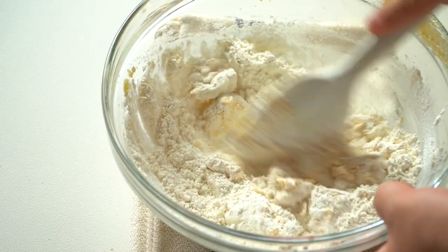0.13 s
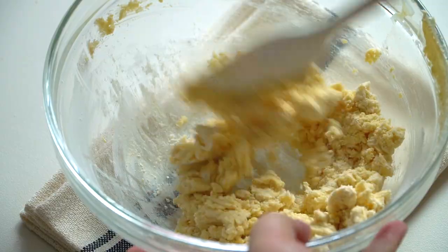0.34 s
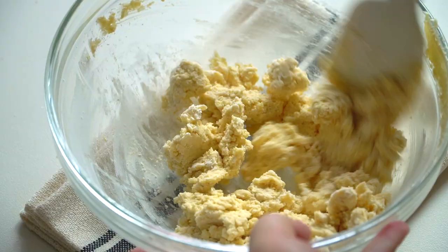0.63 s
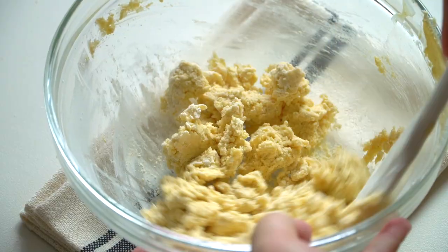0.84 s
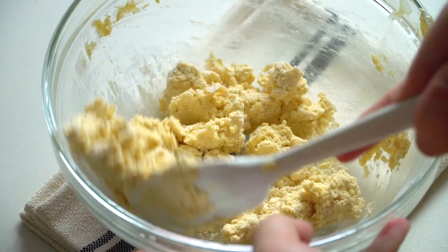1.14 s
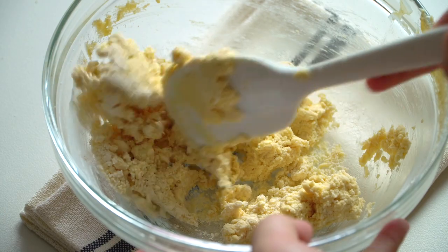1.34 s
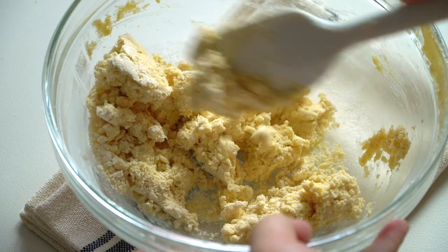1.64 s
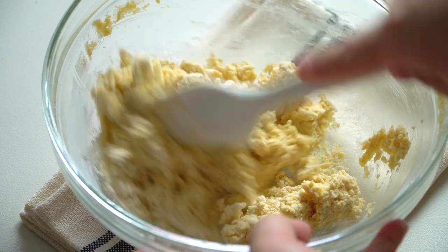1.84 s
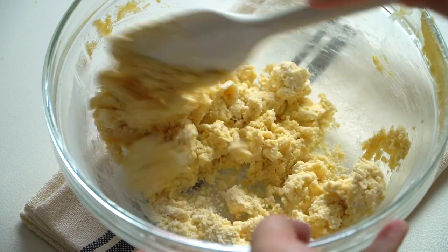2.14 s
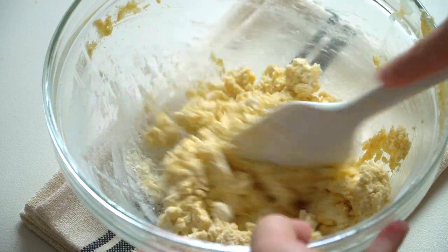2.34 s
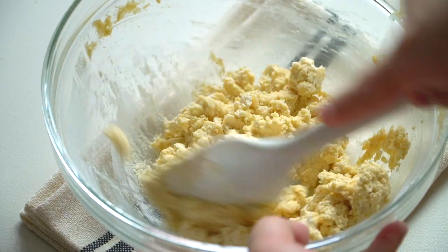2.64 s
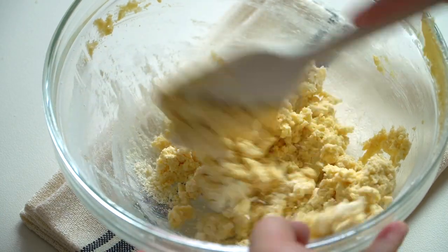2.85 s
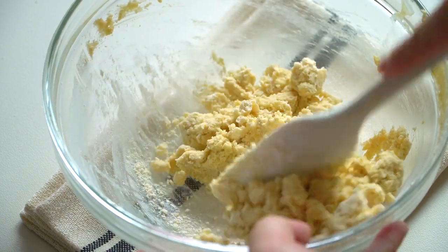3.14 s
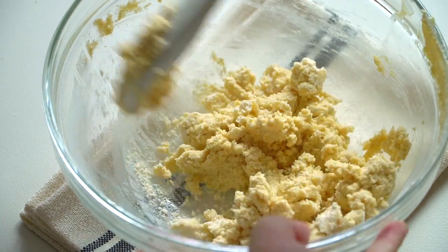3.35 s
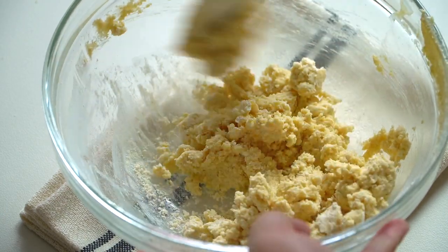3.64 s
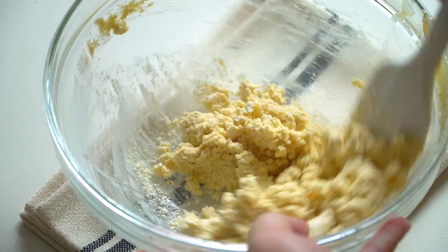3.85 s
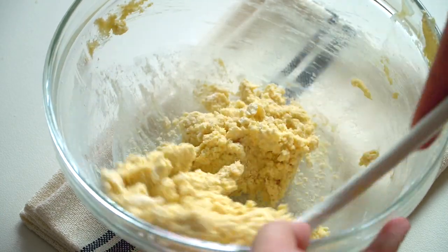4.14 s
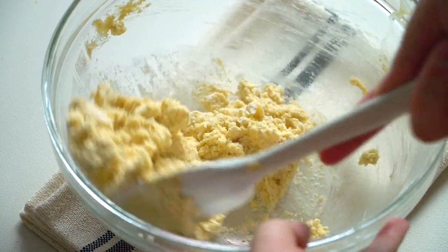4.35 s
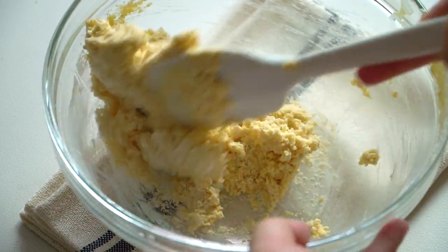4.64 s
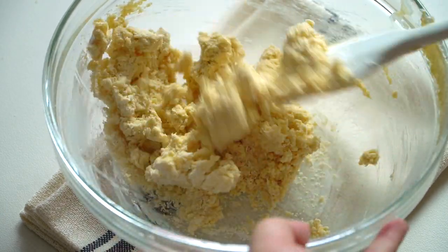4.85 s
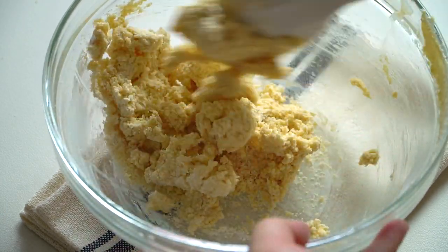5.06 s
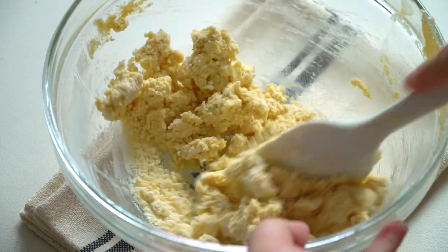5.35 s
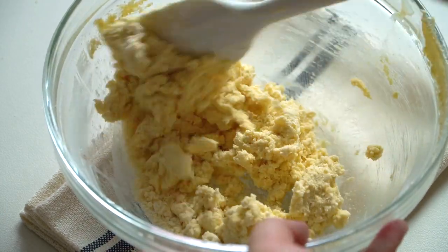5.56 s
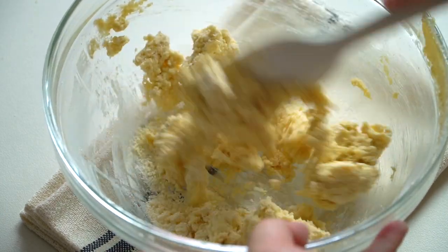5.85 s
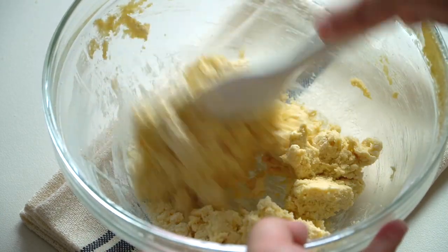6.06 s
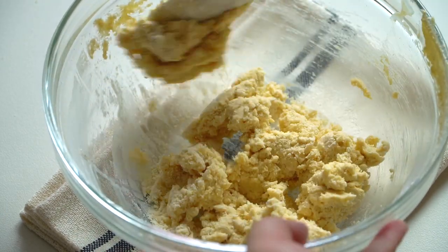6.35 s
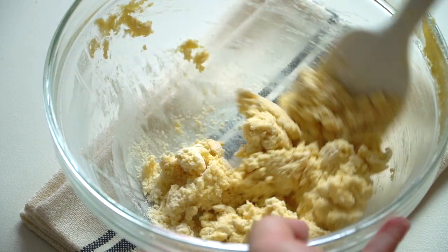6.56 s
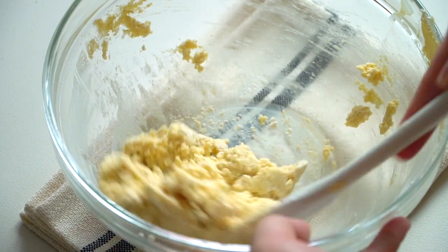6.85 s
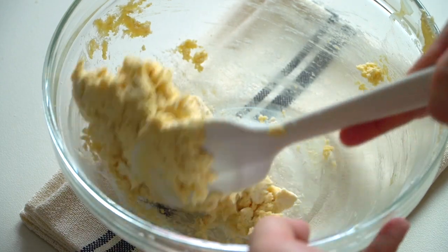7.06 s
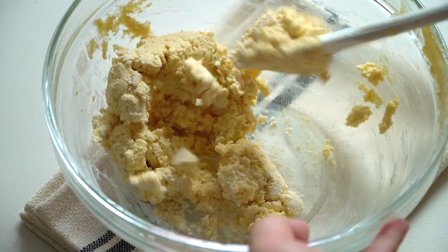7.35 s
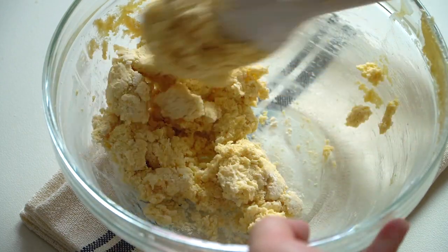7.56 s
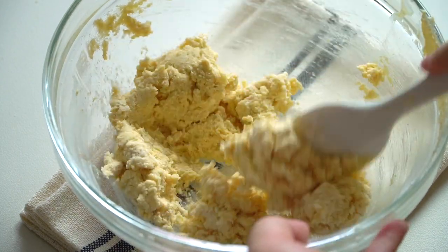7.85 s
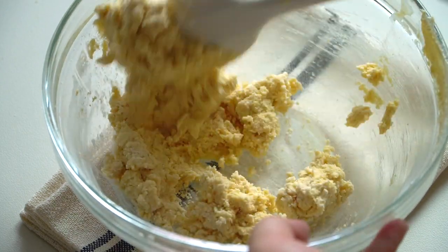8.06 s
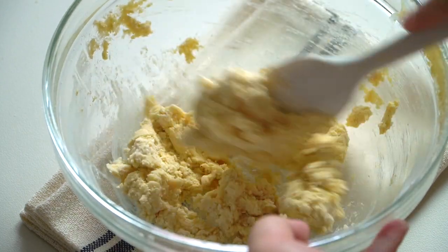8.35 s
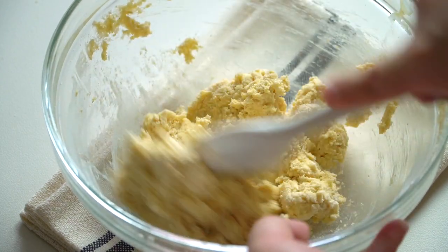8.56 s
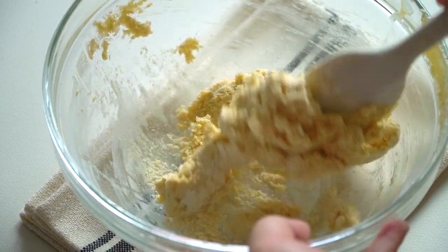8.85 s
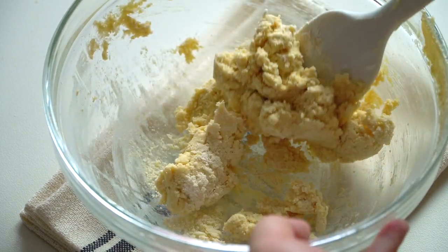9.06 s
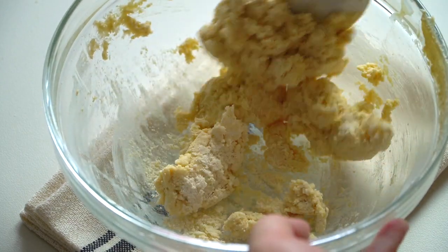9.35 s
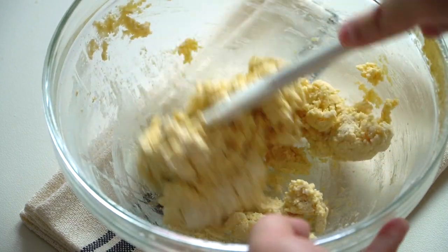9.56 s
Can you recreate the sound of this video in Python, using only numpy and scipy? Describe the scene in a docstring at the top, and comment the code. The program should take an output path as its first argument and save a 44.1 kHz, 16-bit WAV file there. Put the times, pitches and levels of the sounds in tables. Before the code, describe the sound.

A close, dry, centred take of crumbly dough being mixed in a glass bowl. At 0.1 s the blade plunges with a low thump and packed flour groan; a short bright crunch and ticks follow at 0.3. From 0.5 to 1.3 a long gritty sweep hisses round the glass, beginning with a knock. Chops crunch at 1.9, 2.3, 2.7 and 3.1, with deep bowl thuds and small ticks. A second sweep runs 3.5 to 4.6 over a low drag of the bowl, then crumbs patter. Chops return around 5.3, 5.7 and 6.05. A third sweep lasts 6.4 to 7.1. Folds at 7.8, 8.2 and 8.65 crunch and knock; a sharp tick at 8.7 leads into spilling crumbs and light ticks until 9.5, then softer pushes and a bright tick near 9.7. Faint appliance throbs, about seven per second, and low room hum sit behind.

```python
"""A spatula chops, folds and scrapes crumbly cookie dough round a glass bowl on a kitchen counter.
Friction is random grit filtered by bowl and air pocket: chops crunch, long sweeps hiss along the glass.
Damped oscillations give the thumps of the bowl on its towel, the knocks of the blade and the ticks of
hard bits; crumbs are short pings, and sticking dough rings the wall. An appliance throbs softly behind,
as decaying casing modes, over filtered noise for the room."""
import sys
import numpy as np
from scipy import signal
from scipy.fft import rfft, irfft
from scipy.io import wavfile
from scipy.ndimage import uniform_filter1d

SR = 44100
rng = np.random.default_rng(int(sys.argv[2]) if len(sys.argv) > 2 else 0)


def master(y):
    """Save y as 16-bit WAV."""
    cut = np.clip(np.atleast_2d(y).T, -1, 1)
    pcm = np.round(cut * 32767)  # scale
    wavfile.write(sys.argv[1], SR, pcm.astype(np.int16))


N = 427769
TIME = np.arange(N) / SR
BINS = np.fft.rfftfreq(N, 1 / SR)

# spectrum of the room air: [f/Hz, relative level/dB]
ROOM_SPECTRUM = [(15, -22), (25, 2), (59, 4.5), (170, -2), (276, -4), (414, -9), (572, -6.5), (1150, -13),
                 (2730, -20.5), (8260, -29.5), (15800, -31)]
# modes of the appliance's casing: [f/Hz, relative level/dB]
CASING_MODES = [(215, -6), (310, -3.5), (588, -2.5)]
# bouts of louder throbbing: [start t/s, length t/s, relative level/dB]
THROB_BOUTS = [(0.61, 0.67, -39), (1.291, .3, -39.5), (2.839, .14, -37), (3.251, .43, -39),
               (3.829, .45, -36.5), (4.41, .42, -39.5), (5.977, .43, -38), (6.509, .29, -34.5)]
# the bowl is dragged round on the counter, one curve each time: [t/s, level/dB]
BOWL_DRAGS = [
    [(.56, -44), (.78, -49.5)],
    [(3.281, -46), (3.7, -39), (3.92, -54)],
]
# packed flour groans under the first plunge: [t/s, level/dB]
FLOUR_GROAN = [(.13, -56), (.24, -43), (.33, -56)]
# the blade bottoms out and the bowl rocks on its towel: [t/s, level/dB, nominal rocking f/Hz]
BOWL_THUMPS = [(0.136, -23.5, 58), (0.525, -28, 36.7), (1.93, -23.5, 57), (2.333, -17.5, 76),
               (2.688, -17, 73.4), (3.093, -22.5, 75), (3.451, -28, 97), (3.532, -32, 114),
               (3.693, -30, 67.4), (5.329, -22, 73), (5.654, -33.5, 45.2), (5.736, -20, 72.5),
               (6.432, -24.5, 43.5), (7.8, -27.5, 74), (8.225, -26, 63)]
# the blade knocks on the glass: [t/s, peak level/dB]
BLADE_KNOCKS = [(0.508, -27), (1.575, -38.5), (1.759, -38), (1.931, -21.5), (2.233, -35.5), (2.366, -23.5),
                (2.993, -30), (3.705, -31.5), (5.739, -28), (6.397, -31.5), (7.819, -28.5), (8.016, -37.5),
                (8.125, -32), (8.202, -29), (8.535, -33.5), (8.652, -26), (9.275, -27), (9.692, -31)]
# modes of the hand-damped bowl under a knock: [mean f/Hz, mean relative level/dB, t60/s]
KNOCK_MODES = [(510, -7, 0.02), (775, 1.5, 0.024), (1365, 4.5, 0.0053), (2017, -7, 0.02), (2610, 3, 0.0068),
               (3470, -4, 0.009)]
# hard bits tick on the wall: [t/s, level/dB, f/Hz]
WALL_TICKS = [(0.2848, -33, 4440), (0.311, -27, 3800), (2.176, -25, 3800), (3.2318, -28, 3650),
              (3.2959, -25, 2860), (4.9203, -32, 4040), (4.994, -28, 4620), (7.195, -36, 10500),
              (7.512, -38, 3330), (7.5524, -35.5, 4600), (8.7144, -22, 4660), (8.8666, -31.5, 7350),
              (8.903, -35, 4900), (8.9395, -31, 5840), (8.981, -30.5, 3930), (9.3323, -32.5, 7300),
              (9.6822, -20, 6650)]
# crumbs spill off the lifted blade: [start t/s, length t/s, stirring level/dB]
CRUMB_SPILLS = [(4.66, 0.15, -47), (8.826, 0.66, -49)]
# sticky dough peels off and makes the wall chatter: [start t/s, length t/s, level/dB]
DOUGH_PEELS = [(.3, .23, -57.5), (2.145, .07, -53), (2.3, .16, -45.5), (5.5, .8, -64), (8.4, .1, -61)]
# ringing of the glass under the rubbing blade: [f/Hz, width/Hz, mean relative level/dB]
GLASS_MODES = [(3750, 80, -19), (8470, 60, -18.5), (9430, 60, -18.5), (10100, 70, -21), (11000, 70, -23)]
# spectrum of the grinding grit: [f/Hz, relative level/dB]
GRIT_SPECTRUM = [(240, -13.5), (400, -10), (481, -12.5), (570, -9.5), (1070, -8.5), (2610, -3.5),
                 (3840, -1.5), (7100, -3.5), (8030, -11), (11500, -11.5), (15500, -18), (15800, -40)]
# short pushes through the dough; rise and fall are times for a tenfold change of force:
# [full force at t/s, rise t/s, hold t/s, fall t/s, friction level/dB, bite depth/dB, air pocket level/dB]
CHOPS = [(0.136, 0.023, 0.064, 0.12, -51, 9, 0), (0.308, 0.0036, 0.013, 0.027, -43, -6.5, -30),
         (1.926, 0.099, 0.12, 0.035, -42, -4, -4.5), (2.339, 0.12, 0.082, 0.1, -40.5, -5, -12),
         (2.691, 0.041, 0.0044, 0.0079, -44, 0, -28), (2.743, 0.069, 0.053, 0.046, -42.5, -1.5, -5),
         (3.108, 0.1, 0.026, 0.1, -39.5, -2, -19), (5.344, 0.11, 0.062, 0.045, -39, -1.5, -2.5),
         (5.744, 0.13, 0.065, 0.024, -42, -2.5, -8), (6.055, 0.07, 0.14, 0.06, -47.5, -3, -12),
         (7.811, 0.17, 0.05, 0.11, -44.5, -3.5, -8.5), (8.249, 0.13, 0.028, 0.081, -41, -5, -29),
         (8.647, 0.13, 0.087, 0.15, -43.5, -4, -42), (9.237, 0.057, .01, 0.23, -54, -11, -57),
         (9.466, 0.099, 0.025, 0.19, -47.5, -8, -36), (9.687, 0.35, .03, .1, -47.5, -10, -32)]
# long sweeps along the glass, one curve each: [t/s, relative friction level/dB, treble level/dB]
SWEEPS = [
    [(.51, -58, -8), (.527, -45.5, -9), (.626, -37.5, -8), (.66, -40, -10), (.824, -45, -11.5),
     (.882, -40, -7.5), (1.164, -38, -9.5), (1.206, -46, -13), (1.286, -50, -9), (1.35, -64, -10)],
    [(3.535, -57, -5), (3.578, -49, 0), (3.67, -50.5, -2), (3.714, -36, -5), (3.778, -42.5, -11),
     (3.82, -40, -12), (3.98, -39.5, -9.5), (4.05, -43.5, -12.5), (4.36, -40, -10), (4.6, -51, -7.5),
     (4.65, -67, 0)],
    [(6.423, -54, -16), (6.437, -39, -3.5), (6.47, -40.5, -9), (6.51, -36.5, -12.5), (6.6, -42.5, -14),
     (6.736, -38.5, -11.5), (6.8, -42.5, -11), (7.048, -45, -4.5), (7.125, -62, -9)],
]
# where each sweep is deepest in the dough: [t/s, air pocket level/dB]
SWEEP_BITE = [(.95, -3), (3.95, -5), (6.68, 1.5)]
# the blade at rest: [friction level/dB, bite depth/dB, air pocket level/dB, treble level/dB]
IDLE_BLADE = (-70.5, -6.5, -16, -5.5)

ROOM_DB, EDGE_HZ = -53.5, 15800
THROB_PERIOD_S = .145
BOOM_ABOVE_DB, BOOM_BELOW_HZ = -40.5, 450  # throbs harder than this also shake the low modes more
RUSTLE_DB = -15  # friction of spilling crumbs, relative to their stirring
RING_DB = -5
CHOP_TREBLE_DB = -11.5
SWEEP_GAIN_DB = -1.5
SWEEP_DEPTH_DB, SHALLOWING = -10, 0.46  # the brighter the hiss, the shallower the bite (dB per dB)
POCKET_DB_PER_S = 38  # either side of the deepest point the blade rides up the wall
CLING_DB, CLING_DB_PER_S = -13, 52  # dough clings to the lifted blade and crumbles away


def amp(db):
    """Level definition: decibels to amplitude ratio."""
    return 10 ** (np.asarray(db) / 20)


def unit(x):
    """Normalisation to rms 1."""
    return x / np.sqrt(np.mean(x ** 2) + 1e-20)


def add(mix, s, sound):
    """Superposition: adds a sound into the mix, in place, from t = s."""
    part = mix[max(round(s * SR), 0):][:len(sound)]
    part += sound[:len(part)]


def noise():
    """White noise: equal mean power at all frequencies."""
    return rng.standard_normal(N)


def wander(per_s):
    """Slow random fluctuation with rms 1, interpolated between independent values."""
    steps = rng.standard_normal(8000)
    return unit(np.interp(TIME * per_s * 2, np.arange(len(steps)), steps))


def grains(per_s, spread_db):
    """Shot noise: random impulses of either sign, most of them small and a few large."""
    size = amp(spread_db * np.minimum(rng.exponential(1, N), 5))
    sign = np.sign(noise())
    return unit(size * sign * (rng.random(N) < per_s / SR))


def colour(x, points):
    """Linear filtering by a spectrum drawn on a log-frequency axis."""
    hz, db = np.transpose(points)
    gain_db = np.interp(np.log(BINS + 1), np.log(hz), db)
    return unit(irfft(rfft(x) * amp(gain_db), N))


def band(x, lo_hz, hi_hz):
    """Band-pass filtering."""
    edges = [lo_hz, min(hi_hz, SR / 2 - 1)]
    return signal.sosfilt(signal.butter(3, edges, "band", fs=SR, output="sos"), x)


def resonate(x, hz, width):
    """Resonance, fixed or moving: shift hz to zero, smooth with a one-pole filter, shift back; rms 1."""
    turn = np.exp(2j * np.pi * np.cumsum(hz * np.ones(N)) / SR)
    r = np.exp(-np.pi * width / SR)
    return unit((turn * signal.lfilter([1 - r], [1, -r], x / turn)).real)


def room(hum_db=-61, whine_db=-79):
    """Broadband air noise, with narrow resonances for a low hum and a thin electrical whine."""
    hum = resonate(resonate(noise(), 47, 40), 47, 40)
    whine = resonate(resonate(noise(), 8030, 90), 8030, 90)
    return amp(ROOM_DB) * colour(noise(), ROOM_SPECTRUM) + amp(hum_db) * hum + amp(whine_db) * whine


def appliance(level_db=-7, swell_s=0.0071, weak_db=-47):
    """Periodic excitation of casing modes: seven soft throbs a second, weaker ones between the bouts."""
    out, t = np.zeros(N), np.arange(SR // 8) / SR
    swell = t / swell_s * np.exp(1 - t / swell_s)
    ends = [s for s, _, _ in THROB_BOUTS[1:]] + [N / SR]
    for (s, length, db), end in zip(THROB_BOUTS, ends):
        for at in np.arange(s, end - THROB_PERIOD_S / 2, THROB_PERIOD_S):
            throb_db = db if at + THROB_PERIOD_S / 2 < s + length else weak_db
            boom_db = max(throb_db - BOOM_ABOVE_DB, 0) / 2
            ring = np.zeros(len(t))
            for hz, mode_db in CASING_MODES:
                gain_db = mode_db + boom_db * (hz < BOOM_BELOW_HZ) + 2 * rng.standard_normal()
                detuning = .5 * rng.standard_normal() * t / swell_s
                ring += amp(gain_db) * np.sin(2 * np.pi * (hz * t + rng.random()) + detuning)
            add(out, at, amp(level_db + throb_db) * swell * ring)
    return out


def kitchen(x, wet_db=-15, t60=0.13):
    """Reverberation: counter and nearby walls return a short, faint, exponentially decaying wash."""
    t = np.arange(SR // 2) / SR
    tail = rng.standard_normal(len(t)) * amp(-60 * t / t60)
    return x + amp(wet_db) * signal.oaconvolve(x, tail / np.linalg.norm(tail))[:N]


def rumble(rows, lo_hz, hi_hz):
    """Juddering friction: band-limited shot noise under a level curve."""
    s, db = np.transpose(rows)
    level = amp(np.interp(TIME, s, db, left=-120, right=-120))
    return level * unit(band(grains(900, 0.91), lo_hz, hi_hz))


def thumps(crest_turns=0.55, slowing=0.93, shudder_db=-14, shudder_hz=69, shudder_s=0.051):
    """Damped rocking: the bowl dips and rebounds on the towel, fast at first, then shudders under the push."""
    out, t = np.zeros(N), np.arange(SR // 2) / SR
    for s, db, hz in BOWL_THUMPS:
        u = (hz * t / crest_turns) ** slowing  # envelope crest at u = 1
        rock = np.sin(2 * np.pi * crest_turns * u) * (u * np.exp(1 - u)) ** 3
        v = t / shudder_s
        shudder_turns = shudder_hz * rng.uniform(.85, 1.15) * t + rng.random()
        shudder = np.sin(2 * np.pi * shudder_turns) * v ** 2 * np.exp(1 - v ** 2)
        add(out, s, amp(db) * (rock + amp(shudder_db) * shudder))
    return out


def knocks(contact_s=0.0021, clack_db=-5, clack_t60=0.019):
    """Impact on damped modes: hand and dough dull the bowl at once, and crushed crumbs add a gritty clack."""
    out, t = np.zeros(N), np.arange(SR // 10) / SR
    for s, db in BLADE_KNOCKS:
        ring = np.zeros(len(t))
        for k, (hz, mode_db, t60) in enumerate(KNOCK_MODES):
            decay = amp(mode_db + rng.standard_normal() - 60 * t / t60)
            ring += (-1) ** k * decay * np.sin(2 * np.pi * hz * rng.normal(1, 0.034) * t)
        clack = unit(band(rng.standard_normal(len(t)), 1110, 4400))
        ring += amp(clack_db - 60 * t / clack_t60) * clack
        ring *= 1 - np.exp(-t / contact_s)  # the soft blade takes a moment to land
        add(out, s, amp(db) * ring / abs(ring).max())
    return out


def ticks(ring_cycles=19, crack_db=-7, crack_t60=0.0072, contact_s=0.00017):
    """Hard impact: each bit gives a tiny noise crack and a few cycles of one glass tone."""
    out, t = np.zeros(N), np.arange(SR // 20) / SR
    for s, db, hz in WALL_TICKS:
        # the tone falls 60 dB in ring_cycles periods
        ring = np.sin(2 * np.pi * hz * t) * amp(-60 * hz * t / ring_cycles)
        crack = unit(band(rng.standard_normal(len(t)), 940, 6500)) * amp(crack_db - 60 * t / crack_t60)
        add(out, s, amp(db) * (ring + crack) * (1 - np.exp(-t / contact_s)))
    return out


def spilling():
    """Excitation by falling crumbs: stirring level in dB over time."""
    stir_db = np.full(N, -np.inf)
    for s, length, db in CRUMB_SPILLS:
        stir_db[(TIME > s) & (TIME < s + length)] = db
    return stir_db


def crumbs(force_db, level_db=-63, follow=0.34, per_s=8, spread_db=3, ring_cycles=4):
    """Random fracture and impact: crumbs of many sizes snap and drop, also while the blade is lifted."""
    stir = unit(amp(follow * force_db))
    out, t = np.zeros(N), np.arange(SR // 100) / SR
    for hz in np.geomspace(3500, 14000, num=20):  # twenty pitches, each with its own crumbs of random sizes
        size = amp(spread_db * np.minimum(rng.exponential(1, N), 3))
        hits = size * (rng.random(N) < per_s / SR)
        ping = np.cos(2 * np.pi * hz * t) * amp(-60 * hz * t / ring_cycles)
        out += np.sqrt(hz) * signal.oaconvolve(hits, ping)[:N]
    return amp(level_db) * stir * unit(out)


def peels(wall_hz=3770, width=80):
    """Stick-slip: quick releases of sticking dough ring one mode of the glass wall."""
    grip = np.zeros(N)
    for s, length, db in DOUGH_PEELS:
        add(grip, s, amp(db) * signal.windows.tukey(round(length * SR), .25))
    catch = unit(amp(2 * wander(40)))  # the dough lets go unevenly
    wall = resonate(resonate(grains(730, 2.6), wall_hz, width), wall_hz, 10 * width)
    return grip * catch * wall


def blade():
    """Contact force: friction, bite depth, air pocket and treble in dB; the strongest stroke leads."""
    strokes = []
    for s, rise, hold, fall, db, depth_db, pocket_db in CHOPS:
        away = np.maximum((s - TIME) / rise, 0) + np.maximum((TIME - s - hold) / fall, 0)
        treble_db = CHOP_TREBLE_DB - .5 * min(depth_db, 0)
        strokes.append((db - 20 * away, depth_db, pocket_db, treble_db))
    for curve, (s, deepest_db) in zip(SWEEPS, SWEEP_BITE):
        times, db, treble_db = np.transpose(curve)
        db = SWEEP_GAIN_DB + np.interp(TIME, times, db, left=-np.inf, right=-np.inf)
        treble_db = np.interp(TIME, times, treble_db)
        depth_db = SWEEP_DEPTH_DB - SHALLOWING * treble_db
        pocket_db = deepest_db - POCKET_DB_PER_S * abs(TIME - s)
        strokes.append((db, depth_db, pocket_db, treble_db))
    state = IDLE_BLADE
    for stroke in strokes:
        state = [np.where(stroke[0] > state[0], new, old) for new, old in zip(stroke, state)]
    force_db, *tone = state
    # clinging dough sets a floor that falls steadily after each stroke
    fade = CLING_DB_PER_S * TIME
    cling_db = np.maximum.accumulate(force_db + fade) - fade + CLING_DB
    return np.maximum(force_db, cling_db), *tone


def patchy(x, patch_db=2, per_s=16):
    """Varying contact: as its shape changes, each frequency band swells and fades on its own."""
    hz, t, z = signal.stft(x, SR, nperseg=256)
    patches = uniform_filter1d(rng.standard_normal(z.shape), size=6, axis=0)
    patches = unit(uniform_filter1d(patches, size=round(1 / (t[1] * per_s)), axis=1))
    return unit(signal.istft(z * amp(patch_db * patches), SR, nperseg=256)[1][:N])


def dough(force_db, depth_db, pocket_db, treble_db, clump_db=0.78, clumps_per_s=70, coarse_db=-4,
          crunch_db=-2, hollow_db=-10, gap_db=-1, gap_hz=2080, deep_db=-2, octave_db=10):
    """Granular friction: sugar and flour grind in small clumps, coloured by bowl and air pocket."""
    force = amp(force_db + clump_db * wander(clumps_per_s))
    grit = grains(12000, 2) + amp(coarse_db) * grains(500, 2)
    grit = patchy(colour(grit, GRIT_SPECTRUM))
    low = signal.sosfiltfilt(signal.butter(2, 2300, fs=SR, output="sos"), grit)
    top = signal.sosfiltfilt(signal.butter(6, 7800, "high", fs=SR, output="sos"), grit)
    # where the blade skims bare glass it hisses brighter and lets the bowl ring
    fizz = unit(grit - low - top) + amp(treble_db) * unit(top)
    glass = sum(amp(db + 2 * wander(2)) * resonate(noise(), hz, width) for hz, width, db in GLASS_MODES)
    ring = amp(RING_DB - .5 * depth_db) * glass
    crunch = amp(crunch_db) * unit(low)
    hollow = amp(hollow_db) * unit(band(grains(4000, 2.5), 634, 880))
    # the air pocket behind the blade grows, and sounds lower, with bite depth up to deep_db
    octaves_up = (deep_db - np.minimum(depth_db, deep_db)) / octave_db
    pocket_hz = gap_hz * 2 ** (octaves_up + 0.086 * wander(18))
    pocket = resonate(resonate(grains(2500, 4.0), pocket_hz, 900), pocket_hz, 900)
    pocket = amp(gap_db + pocket_db) * pocket
    return force * (fizz + ring + pocket + amp(depth_db) * (crunch + hollow))


def scene():
    """Superposition of all sources at one close point, identical in both channels."""
    background = room() + appliance()
    drags = sum(rumble(drag, lo_hz=25.9, hi_hz=81) for drag in BOWL_DRAGS)
    groans = rumble(FLOUR_GROAN, lo_hz=135, hi_hz=337) + drags
    force_db, *tone = blade()
    spill_db = spilling()
    hits = knocks() + ticks() + crumbs(np.maximum(force_db, spill_db))
    rubbing = dough(np.maximum(force_db, spill_db + RUSTLE_DB), *tone) + peels()
    mono = background + groans + thumps() + kitchen(hits) + rubbing
    return np.array([mono, mono])


def record(dry):
    """Band limitation: a steep linear-phase low-pass."""
    lowpass = signal.firwin(1023, EDGE_HZ, window=("kaiser", 9), fs=SR)
    return signal.oaconvolve(dry, lowpass[None], "same")


dry = scene()
out = record(dry)
master(out)
```